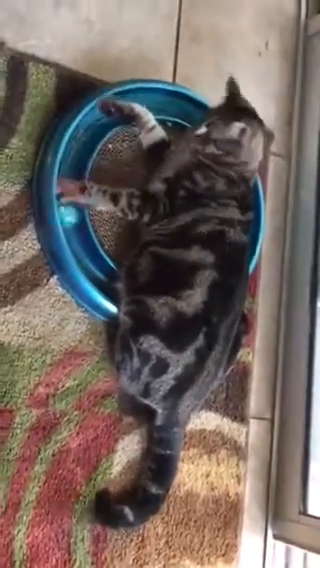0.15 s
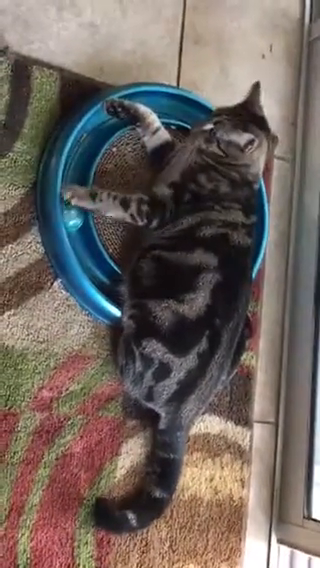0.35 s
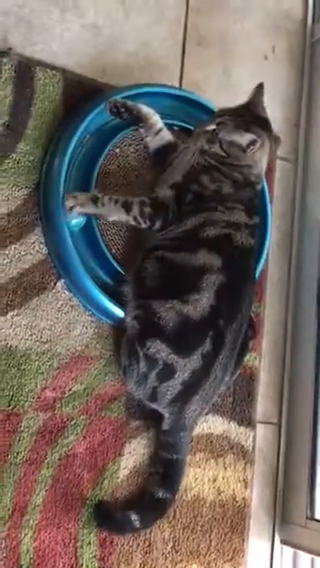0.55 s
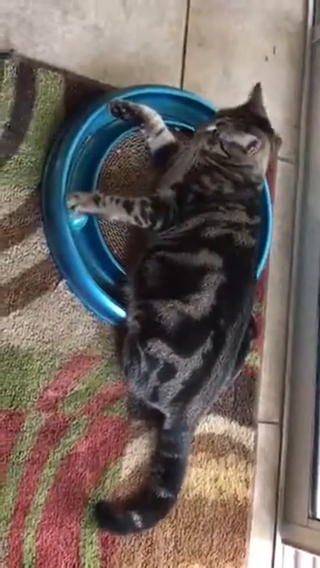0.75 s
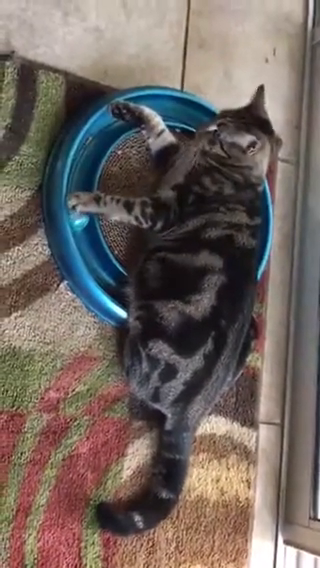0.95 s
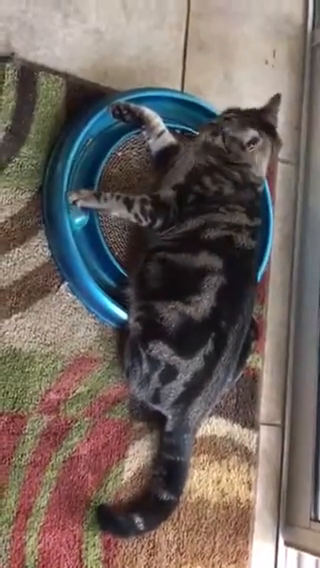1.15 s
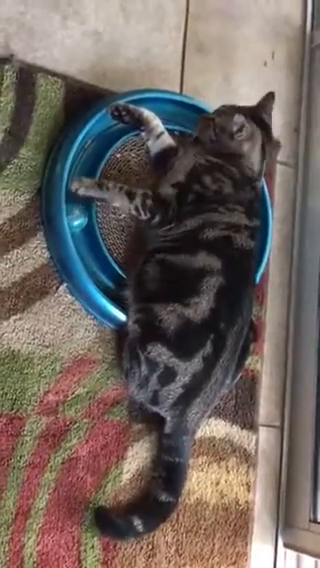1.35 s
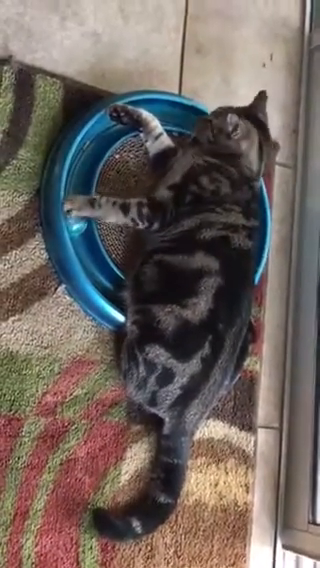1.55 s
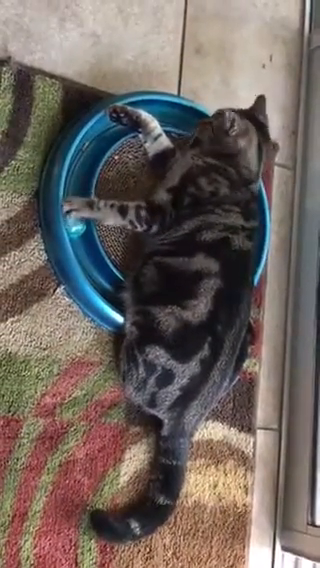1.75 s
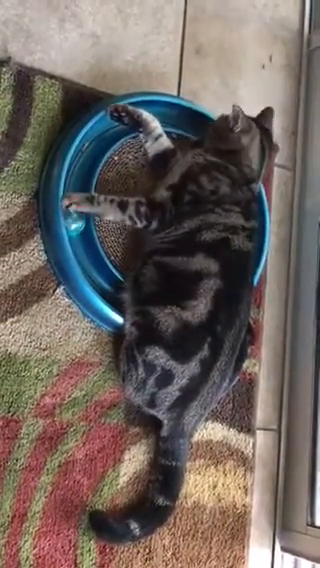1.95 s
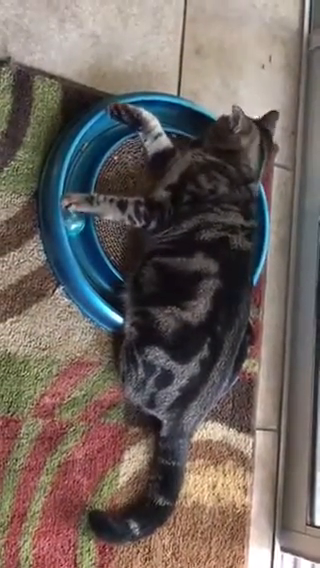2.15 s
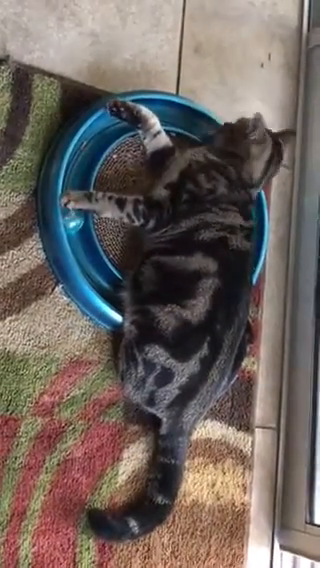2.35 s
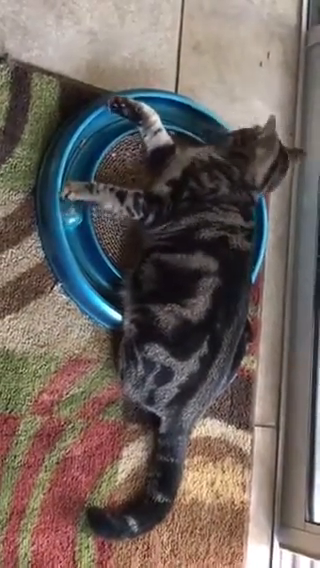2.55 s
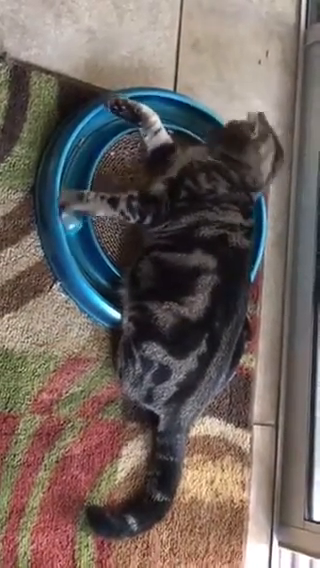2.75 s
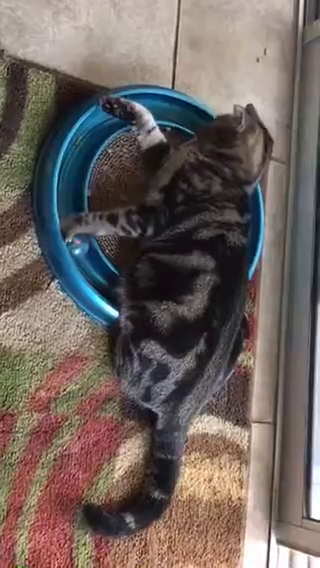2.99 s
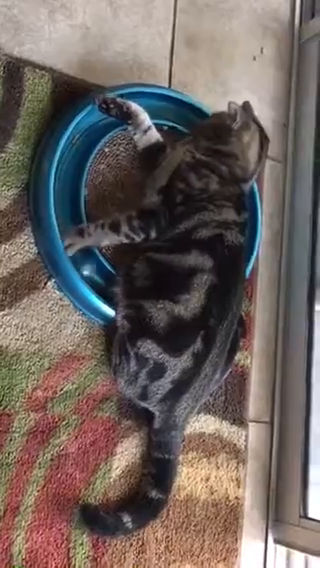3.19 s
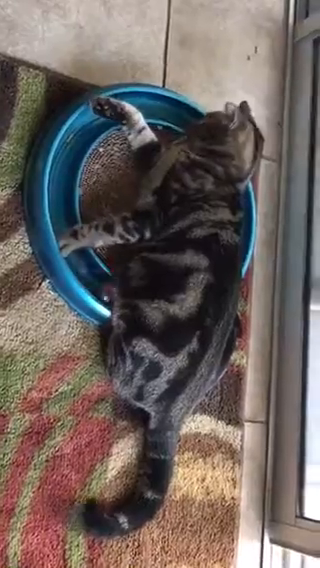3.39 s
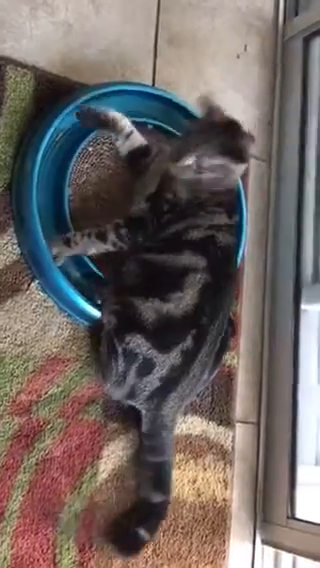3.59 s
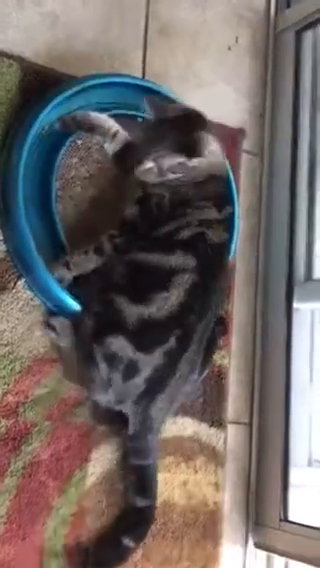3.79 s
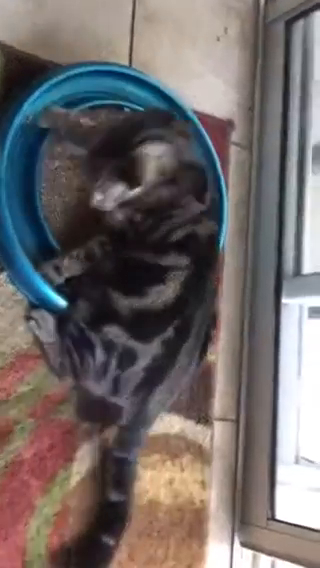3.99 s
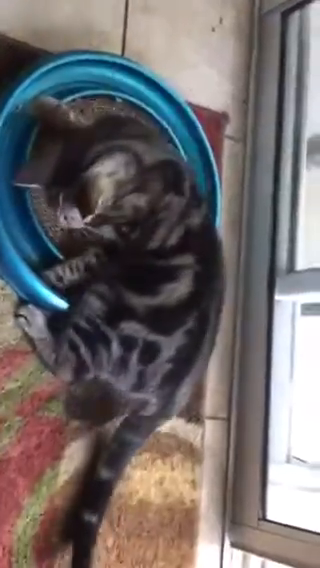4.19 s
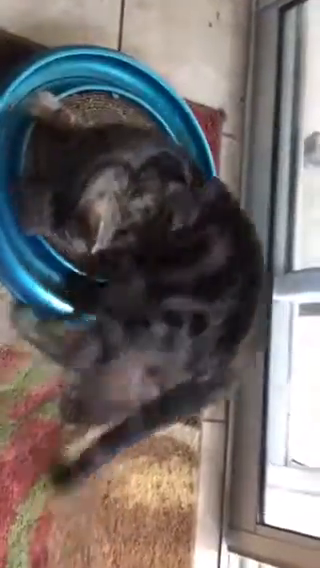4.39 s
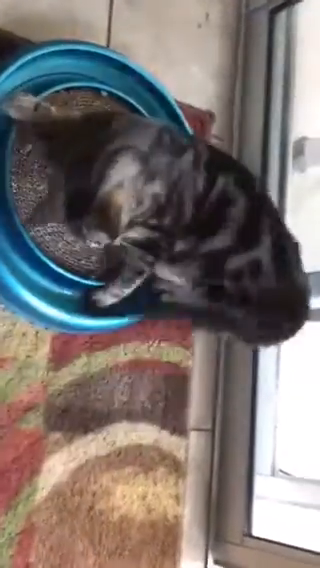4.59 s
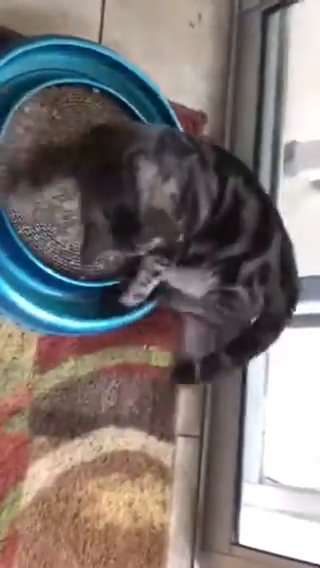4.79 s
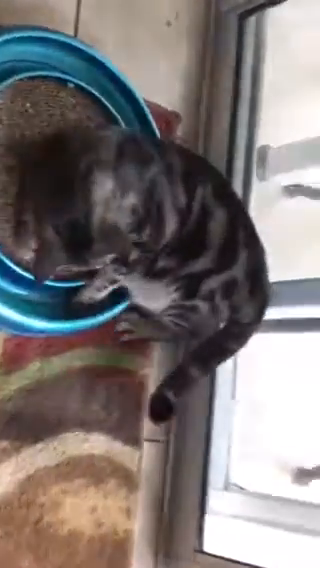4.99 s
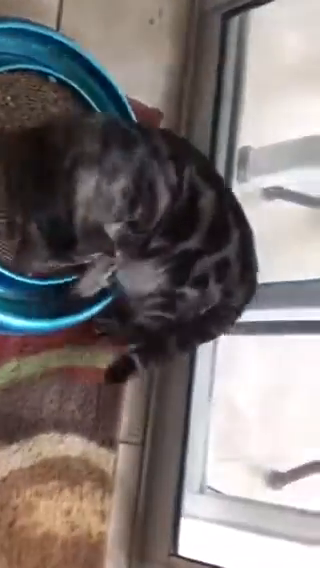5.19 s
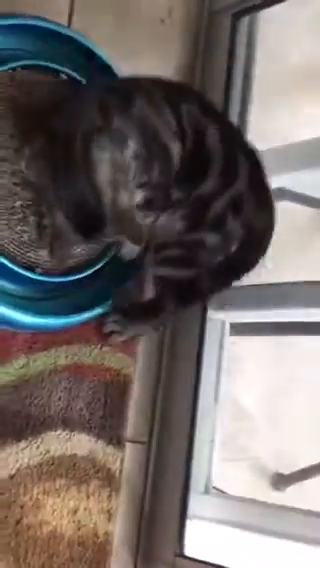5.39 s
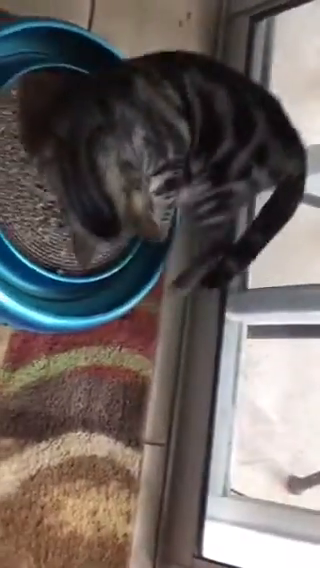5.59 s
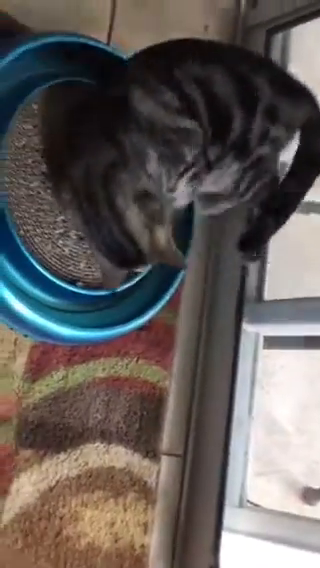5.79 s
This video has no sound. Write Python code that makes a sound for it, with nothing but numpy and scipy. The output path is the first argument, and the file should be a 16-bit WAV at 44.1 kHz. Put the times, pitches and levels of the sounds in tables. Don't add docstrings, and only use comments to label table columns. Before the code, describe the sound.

A kitten thumps and scuffs a hollow plastic toy nearby; cutlery and crockery clatter farther off, with two short chair squeaks midway.

```python
import sys
import numpy as np
from scipy import signal
from scipy.fft import rfft, irfft, next_fast_len
from scipy.io import wavfile
from scipy.ndimage import uniform_filter1d, map_coordinates

SR = 44100
rng = np.random.default_rng(int(sys.argv[2]) if len(sys.argv) > 2 else 0)


def ratio_of_db(decibels):
    return 10 ** (np.asarray(decibels, float) / 20)


def put_to_file(sound):
    columns = np.atleast_2d(sound).T
    safe = np.clip(columns, -1, 1)
    whole_steps = np.round(safe * 32767)
    wavfile.write(sys.argv[1], SR, whole_steps.astype(np.int16))


N = 257544

# frequency [Hz], density [dB per Hz].
AIR_SPECTRUM = [(20, -43), (35, -1), (65, 4), (114, 0.5), (165, -3.5), (390, -17.5), (520, -53), (900, -72)]
HISS_SPECTRUM = [(300, -19.5), (2460, -25.5), (7000, -39), (10000, -46), (13000, -33), (15800, -47)]
# frequency [Hz], level [dB].
FRIDGE_HUM = [(59.5, -70.5), (119.5, -73), (188, -79), (236, -77.5), (380, -80)]
# frequency [Hz], t60 [s].
ROOM_T60 = [(200, 0.32), (1300, 0.45), (4000, 0.42), (10000, 0.3)]

# frequency [Hz], density [dB per Hz].
RUB_SPECTRUM = [(650, -10), (1100, -1), (1850, 2), (3840, 2.5), (4980, -1), (8290, -3.5), (12000, -18),
                (15600, -40)]
FINE_SPECTRUM = [(3000, -37), (5000, -0.5), (7600, -3), (9500, 1.5), (13200, -4), (16000, -10)]
# resonance [Hz], width [Hz], level [dB].
RING_MODES = [(218, 60, 1), (296, 70, 5), (412, 60, -0.5), (576, 124, 1), (896, 254, -8.5), (1115, 440, -9)]
SCUFF_MODES = [(1150, 610, 0), (1930, 620, 1.5), (3000, 830, -11)]
# start [s], length [s], strength [dB], fine hiss over the rub [dB].
STROKES = [(0, 0.039, -59, -10), (0.105, 0.29, -58, -5.5), (0.683, 0.064, -65.5, -8),
           (0.941, 0.14, -56.5, -8.5), (1.14, 0.14, -71, -4), (1.625, 0.089, -54.5, -17),
           (1.802, 0.081, -67.5, -20), (2.368, .03, -72.5, -7), (2.713, 0.023, -73, -7),
           (2.811, 0.12, -66, 1.5), (3.03, 0.15, -76, -2), (3.508, .01, -62.5, -13),
           (3.603, 0.32, -67, 4.5), (4.044, 0.24, -64, -10), (4.414, 0.082, -62, 0.5),
           (4.57, 0.12, -69, -14), (4.72, 0.041, -61, -1), (4.8, 0.14, -74, -5), (5.094, 0.13, -70, 4.5),
           (5.27, 0.058, -65, -2), (5.35, .04, -63.5, -3), (5.42, 0.084, -64, -5.5),
           (5.56, 0.18, -67.5, -12), (5.761, .1, -64.5, 2)]
# start [s], length [s], strength [dB].
SHOVES = [(0, .02, -54), (.06, 0.07, -53), (.16, .06, -60), (2.6, 0.17, -66), (2.78, 0.18, -65.5),
          (3.215, 0.079, -55.5), (3.36, 0.13, -62.5), (3.5, 0.014, -53), (3.76, 0.11, -58.5),
          (3.97, 0.027, -59.5), (4.04, 0.045, -57.5), (4.11, 0.0052, -45), (4.2, 0.082, -62.5),
          (4.39, 0.071, -51.5), (4.47, 0.032, -48), (4.53, 0.014, -45), (4.65, 0.17, -62),
          (4.87, 0.01, -54), (5.29, 0.06, -49), (5.48, 0.068, -55), (5.72, .12, -63.5)]

# time [s], strength [dB], weight [dB], hard edge [dB].
THUMPS = [(.0875, -48, 9, -8), (.108, -50, 3.5, -12), (.1235, -45.5, 3, -8), (2.572, -55.5, 10.5, -21),
          (2.824, -43, 6.5, -14), (3.1, -56.5, 6, -20), (3.206, -42.5, 5.5, -29), (3.255, -37, -6, -23),
          (3.272, -41, -10, -32), (3.516, -42, 1, -11), (3.534, -47, -13, -15), (4.102, -40.5, 3, -8),
          (4.12, -42, 9, -10), (4.491, -47, 2, -14), (4.5229, -40.5, 12.5, -5), (4.556, -42.5, -4, -12),
          (4.798, -42.5, -17, -1), (4.863, -42, -0.5, -2), (5.2822, -38.5, 3, -2.5), (5.344, -41, -1, -7),
          (5.491, -55, -15, -15), (5.5129, -45, 7.5, -16), (5.774, -47, -8, -16), (5.803, -49.5, -5, -7)]
# time [s], strength [dB], snap [dB], sharp edge [dB].
TICKS = [(0.074, -51, -10, -14), (.568, -53, -14, -22), (2.737, -58.5, 0, 0), (2.746, -57, -11, -14),
         (3.284, -56.5, -2, 0.5), (4.086, -50, -5, -12), (4.303, -53, -6, -10), (4.386, -55, -12, -12),
         (4.3965, -45, 2, 0), (4.448, -53, -10, -10), (4.543, -56, -4, -4), (4.585, -47, -2, -12),
         (4.629, -49, -10, -14), (4.674, -47, 3, -9), (4.767, -44, -1, -8), (4.819, -47, -8, -18),
         (4.847, -53, -14, -16), (4.862, -43, 6, 9.5), (4.935, -51, -3, -9), (4.945, -46, -2, -8),
         (4.976, -63, 9, 10), (5.321, -52, -10, -18), (5.36, -53, -8, -18), (5.579, -54, 1, 1),
         (5.82, -46.5, -10, -14)]
# region [Hz], width [Hz], level [dB], t60 of the push [s], punch [ratio].
CONTACT_PARTS = [
    (271, 145, 14.5, 0.039, 11.9),
    (578, 556, 15, 0.031, 6.2),
    (1840, 1700, 13.5, 0.013, 3.6),
    (4300, 3200, 10.5, 0.008, 4.2),
    (8200, 6500, 9.5, 0.006, 4.0),
]

# time [s], peak [dB].
FORK_MODES = [(1507, 41, -8), (3880, 120, 0), (5400, 33, -6), (7080, 100, 3.5), (8400, 22, -9),
              (9020, 49, -3), (11100, 83, -6), (13600, 39, -8)]
FORK_HITS = [(0.122, -61), (0.171, -57), (0.2444, -62), (0.292, -58), (1.146, -57.5), (1.2145, -77),
             (1.271, -65), (1.305, -65.5), (1.8007, -61), (2.394, -55.5)]
SPOON_MODES = [(4600, 19, -20), (5570, 107, -8), (8380, 79, 4.5), (10550, 38, -0.5), (12400, 35, -14),
               (15600, 97, -10)]
SPOON_HITS = [(1.916, -66), (2.216, -58), (2.887, -55.5), (2.92, -62), (3.06, -67.5), (3.477, -47.5),
              (3.559, -65)]
KNIFE_MODES = [(6160, 48, 0), (7360, 41, -19), (8340, 41, -5), (9360, 32, -6.5), (11200, 35, -22),
               (12400, 226, -4.5), (14100, 54, -31)]
KNIFE_HITS = [
    (5.0426, -46),
    (5.1078, -51.5),
    (5.19, -51),
]
CUP_MODES = [(943, 34, -4.5), (2504, 54, -9.5), (3660, 65, -8)]
CUP_HITS = [
    (1.282, -51),
    (1.768, -52),
]
GLASS_MODES = [(4440, 25, 0)]
GLASS_HITS = [(0.5457, -72), (1.9165, -69), (3.477, -62), (4.664, -62), (4.725, -67)]
BOWL_MODES = [(665, 25.2, 0.5), (1450, 82, -9)]
BOWL_HITS = [
    (1.94, -72),
    (2.235, -60),
    (2.28, -64),
    (2.39, -83),
]
SAUCER_MODES = [(1496, 307, 2), (2180, 200, 11), (2447, 261, 11.5), (2720, 105, 3), (4000, 300, 3)]
SAUCER_HITS = [
    (1.22, -66),
    (2.026, -57),
]
TONGS_MODES = [(6630, 21, -7), (7480, 62, 1), (7900, 41, -4), (8900, 78, -6)]
TONGS_HITS = [
    (1.7995, -56),
    (1.826, -58),
]
PLATE_MODES = [(2920, 130, 0), (3910, 110, 3), (4340, 100, -5)]
PLATE_HITS = [
    (.867, -56),
    (0.892, -49),
    (.968, -53),
]
PAN_MODES = [(4840, 40, 0), (5610, 76, -3), (5990, 28, -3), (6370, 41, -7)]
PAN_HITS = [
    (4.1725, -51),
    (4.19, -54),
    (4.5865, -52),
]
LEG_MODES = [(1140, 70, 0), (2150, 60, 0), (3150, 90, -1)]
LEG_HITS = [
    (3.577, -44),
    (3.587, -42),
]

# time [s], strength [dB], pitch [octaves over the lowest region],
# fall away from that pitch [dB per octave].
KNOCKS = [(0.539, -58, .05, 21), (0.595, -46, 3.7, 8), (0.659, -45, 2.7, 8.5), (0.813, -56.5, 0.34, 5.5),
          (0.8672, -44, 0.76, 15), (0.8914, -34, 1.7, 22.5), (0.9691, -38, 1.5, 7),
          (1.2137, -51.5, 1.9, 11.5), (1.7796, -52.5, .05, 22), (1.8007, -41, 3, 16),
          (1.826, -51.5, 3.6, 7), (1.916, -56.5, 0.045, 1.5), (2.0252, -41.5, 0.48, 16),
          (2.2165, -51, 2.93, 5.5), (2.3935, -49.5, 2.9, 4.5), (2.8845, -49, 2.1, 4),
          (3.4658, -43, 2.6, 11.5), (3.847, -43.5, 3.0, 28), (4.0084, -42.5, 1.47, 15.5),
          (4.173, -37, 2.0, 11), (4.5856, -38.5, 2.78, 10.5), (4.657, -35, 3.54, 8.5),
          (5.044, -37, 2.74, 11.5), (5.1923, -37, 1.61, 15.5), (5.321, -36.5, 3, 27), (5.38, -39.5, 2.6, 9)]
# region [Hz], width [Hz], level [dB].
DISH_REGIONS = [(1274, 900, 12.5), (2850, 1900, 5), (5010, 2780, 4.5), (9900, 5700, -3)]

# time [s], rate [slips per second].
FIRST_RATE = [(3.572, 285), (3.593, 271), (3.599, 334), (3.61, 348), (3.622, 357.5), (3.645, 355),
              (3.67, 354), (3.74, 352)]
SECOND_RATE = [(3.725, 285), (3.745, 280), (3.756, 273), (3.77, 265), (3.79, 257.5), (3.89, 256)]
# time [s], force [dB], unevenness [dB].
FIRST_FORCE = [(3.572, -58, -3), (3.6, -35.5, 3), (3.61, -32.5, 0), (3.619, -29.5, -2), (3.638, -30, 0),
               (3.654, -44.5, 12), (3.672, -33.5, -7), (3.69, -52.5, 13), (3.74, -59, 2)]
SECOND_FORCE = [(3.722, -47, 1), (3.75, -47, -16), (3.761, -26.5, -18), (3.772, -26.5, -26),
                (3.788, -29, -7), (3.795, -35.5, 1.5), (3.812, -33, -6.5), (3.829, -43.5, 6.5),
                (3.891, -70, 7)]
# multiple of the slip rate [ratio], level [dB].
FIRST_ORDERS = [(.96, -22), (2, -23), (3.11, -8), (4.15, -8), (5, 0), (6.3, -15), (7.55, -11), (8, .5),
                (8.83, -8), (10.3, -12), (11.05, 2), (11.3, -8), (12.1, -11), (12.9, -11), (15.5, -14)]
SECOND_ORDERS = [(1.08, -26), (2.18, -32), (2.95, -32), (3.93, -19), (5, 0), (5.17, -13), (5.75, -18),
                 (6.12, -11), (7.2, -18), (8, -21), (9.15, -10), (10, -12), (10.7, -22), (12.5, -21),
                 (13.1, -18)]
# resonance [Hz], width [Hz], level [dB].
FIRST_FRAME = [(1150, 300, -1), (1650, 400, 1), (2930, 490, 2), (3740, 980, -1), (4620, 210, -4),
               (5350, 580, -9)]
SECOND_FRAME = [(1480, 500, 0), (2330, 370, -4), (3340, 440, -4)]
FIRST_SCREECH_MODES = [(7150, 460, 5), (8600, 700, 2), (12700, 990, 1), (14400, 1600, -2)]
SECOND_SCREECH_MODES = [(6820, 680, -2.5), (8430, 460, 6.5), (9470, 770, 2.5), (11700, 1100, -6),
                        (15200, 900, -9)]


def unit(x):
    return x / np.sqrt(np.mean(x ** 2) + 1e-20)


def along(points, hz):
    f, v = np.transpose(points)
    return np.interp(np.log(hz + 1), np.log(f + 1), v)


def curves(rows):
    s, *cols = np.transpose(rows)
    return [np.interp(np.arange(N) / SR, s, c) for c in cols]


def wobble(rate):
    knots = rng.standard_normal(int(N * rate / SR) + 4)
    return map_coordinates(knots, [np.arange(N) * rate / SR])


def filtered(x, response):
    m = next_fast_len(len(x) + SR // 4)
    return irfft(rfft(x, m) * response(np.fft.rfftfreq(m, 1 / SR)), m)[:len(x)]


def resonance(f, hz, width):
    damping = 1j * f * width
    return damping / (hz * hz - f * f + damping)


def twice(modes):
    return lambda f: sum((-1) ** k * ratio_of_db(db) * resonance(f, hz, 1.5 * width) ** 2
                         for k, (hz, width, db) in enumerate(modes))


def gritty(grit_db, rate):
    return rng.standard_normal(N) * ratio_of_db(grit_db * wobble(rate))


def room(x, wet_db):
    out, step, delay = np.pad(x, (0, SR)), SR // 7, 130
    for i in range(0, N, step):
        piece = x[i:i + step]
        if not piece.any():
            continue
        hz, t, z = signal.stft(rng.standard_normal(SR // 2), SR, nperseg=256)
        decay = ratio_of_db(-60 * t / along(ROOM_T60, hz)[:, None])
        tail = signal.istft(z * decay, SR, nperseg=256)[1]
        answer = signal.fftconvolve(piece, tail / np.linalg.norm(tail))
        out[i + delay:][:len(answer)] += ratio_of_db(wet_db) * answer
    return out[:N]


def strokes(rows, rise_db_s, fall_db_s, rest_db):
    t, power = np.arange(N) / SR, np.full(N, ratio_of_db(2 * rest_db))
    for s, length, db in rows:
        near = slice(max(0, round((s - .2) * SR)), round((s + length + .4) * SR))
        u = t[near] - s
        rise = rise_db_s * np.maximum(-u, 0)
        fall = fall_db_s * np.maximum(u - length, 0)
        power[near] += ratio_of_db(2 * (db - rise - fall))
    return np.sqrt(power)


def bursts(events, regions, length, rise, lag):
    out, t = np.zeros(N), np.arange(round(length * SR)) / SR
    noise = rng.standard_normal((len(events), len(regions), len(t))) * (1 - np.exp(-t / rise))
    for k, (hz, width, gain_db, t60, punch) in enumerate(regions):
        pushes = np.zeros(N + SR)
        for (s, db, *region_db), grain in zip(events, noise):
            push = np.append(punch, grain[k, 1:])
            start = round((s + lag) * SR)
            pushes[start:][:len(t)] += ratio_of_db(db + region_db[k] - 60 * t / t60) * push
        out += filtered(pushes[:N], twice([(hz, width, gain_db)]))
    return out


def rubbing():
    rumble = unit(filtered(gritty(grit_db=3.0, rate=110), twice(RING_MODES)))
    scuff = unit(filtered(gritty(grit_db=6.5, rate=180), twice(SCUFF_MODES)))
    rub = unit(filtered(gritty(grit_db=1.5, rate=210), lambda f: ratio_of_db(along(RUB_SPECTRUM, f))))
    fine = unit(filtered(gritty(grit_db=2.0, rate=280), lambda f: ratio_of_db(along(FINE_SPECTRUM, f))))

    rumble_gain = strokes(SHOVES, rise_db_s=650, fall_db_s=180, rest_db=-70.5)
    scuff_gain = ratio_of_db(-12) * strokes(SHOVES, rise_db_s=650, fall_db_s=303, rest_db=-85)
    rub_rows = [(s, length, db) for s, length, db, _ in STROKES]
    fine_rows = [(s, length, db + over) for s, length, db, over in STROKES]
    rub_gain = ratio_of_db(-0.4) * strokes(rub_rows, rise_db_s=256, fall_db_s=170, rest_db=-79.5)
    fine_gain = ratio_of_db(1.1) * strokes(fine_rows, rise_db_s=256, fall_db_s=170, rest_db=-82)
    return rumble_gain * rumble + scuff_gain * scuff + rub_gain * rub + fine_gain * fine


def air():
    spectrum = lambda f: ratio_of_db(along(AIR_SPECTRUM, f)) + ratio_of_db(along(HISS_SPECTRUM, f))
    noise = unit(filtered(rng.standard_normal(N), spectrum))
    t, hum = np.arange(N) / SR, np.zeros(N)
    for hz, db in FRIDGE_HUM:
        strength = ratio_of_db(db + 4.0 + 2.5 * wobble(3.75))
        hum += strength * np.sin(2 * np.pi * hz * t + 0.32 * wobble(12.0))
    return ratio_of_db(-61.5 + 2.0 * wobble(2.82)) * noise + hum


def contacts():
    claw_db, thud_db, hollow_db = -4.5, -22, -19
    rows = [(s, db, weight, 0, edge, edge + claw_db, edge + 2 * claw_db) for s, db, weight, edge in THUMPS]
    rows += [(s, db, thud_db, hollow_db, 0, snap, sharp) for s, db, snap, sharp in TICKS]
    return room(bursts(rows, CONTACT_PARTS, length=.03, rise=0.0005, lag=.0015), wet_db=-6.5)


def clinks(modes, hits, t60, gain_db):
    out, t = np.zeros(N + SR), np.arange(SR // 6) / SR
    attack = 1 - np.exp(-t / 0.0011)
    for s, db in hits:
        for hz, width, level in modes:
            detune, phase, size = rng.standard_normal((3, 8, 1))
            angle = 2 * np.pi * (hz + 1.098 * width * detune) * t + 3 * phase
            cluster = np.sum(ratio_of_db(2.74 * size) * np.sin(angle), axis=0)
            fade_db = 60 * t / t60 * (hz / 6000) ** 0.23
            peak_db = db + gain_db + level + 1.4 * size[0] - 5.0
            out[round(s * SR):][:len(t)] += ratio_of_db(peak_db - fade_db) * cluster * attack
    return out[:N]


def tableware():
    pieces = [clinks(FORK_MODES, FORK_HITS, t60=0.1, gain_db=-3.5),
              clinks(SPOON_MODES, SPOON_HITS, t60=0.12, gain_db=-6.5),
              clinks(GLASS_MODES, GLASS_HITS, t60=0.077, gain_db=-1.0),
              clinks(PLATE_MODES, PLATE_HITS, t60=0.055, gain_db=-7),
              clinks(SAUCER_MODES, SAUCER_HITS, t60=0.1, gain_db=-8.5),
              clinks(CUP_MODES, CUP_HITS, t60=0.062, gain_db=-5),
              clinks(TONGS_MODES, TONGS_HITS, t60=.05, gain_db=-4),
              clinks(BOWL_MODES, BOWL_HITS, t60=0.18, gain_db=-5.5),
              clinks(LEG_MODES, LEG_HITS, t60=.03, gain_db=-6),
              clinks(PAN_MODES, PAN_HITS, t60=.06, gain_db=-5),
              clinks(KNIFE_MODES, KNIFE_HITS, t60=0.13, gain_db=-7)]
    return sum(pieces)


def knocks():
    octaves = np.log2([hz / DISH_REGIONS[0][0] for hz, _, _ in DISH_REGIONS])
    rows = [(s, db, *(-fall * abs(octaves - pitch))) for s, db, pitch, fall in KNOCKS]
    regions = [(*region, .06, 0) for region in DISH_REGIONS]
    return bursts(rows, regions, length=.08, rise=0.0025, lag=.0005)


def squeak(rates, force, orders, frame, bright, catch, trail, jitter, flutter_db):
    force_db, uneven_db = curves(force)
    full_db, begin = force_db.max(), force[0][0]
    t = np.arange(N) / SR
    on = np.flatnonzero((t > begin) & (t < force[-1][0]))

    catch_s, above_multiple, before_db, after_db, swing_share = catch
    uncaught = np.clip((catch_s - t[on]) / 0.0093 + .5, 0, 1)
    upper_db = after_db + (before_db - after_db) * uncaught + swing_share * (force_db[on] - full_db)

    screech_full_db, share, smooth_s, lag_s = trail
    late_db = np.roll(uniform_filter1d(force_db, round(smooth_s * SR)), round(lag_s * SR))
    screech_db = screech_full_db + share * (late_db - full_db)

    phase = 2 * np.pi * np.cumsum(curves(rates)[0] * (1 + jitter * wobble(140))) / SR
    out, knots = np.zeros(N), [(t[on] - begin) * 90]
    for k, db in orders:
        flutter = map_coordinates(rng.standard_normal(40), knots)
        drift = map_coordinates(rng.standard_normal(40), knots)
        level_db = db + 2.0 + force_db[on] + upper_db * (k > above_multiple) + flutter_db * flutter
        out[on] += ratio_of_db(level_db) * np.sin(k * phase[on] + 6 * rng.random() + 0.054 * k * drift)

    grind = ratio_of_db(force_db + uneven_db) * unit(filtered(gritty(grit_db=3.0, rate=220), twice(frame)))
    screech = ratio_of_db(screech_db) * unit(filtered(gritty(grit_db=2.4, rate=45), twice(bright)))
    out[on] += grind[on] + screech[on] * signal.windows.tukey(len(on), .4)
    return out


def chair():
    first = squeak(FIRST_RATE, FIRST_FORCE, FIRST_ORDERS, FIRST_FRAME, FIRST_SCREECH_MODES,
                   catch=(5.5, 9.5, 2, -12, 1.5), trail=(-51, .8, .03, .008), jitter=0.003, flutter_db=1.5)
    second = squeak(SECOND_RATE, SECOND_FORCE, SECOND_ORDERS, SECOND_FRAME, SECOND_SCREECH_MODES,
                    catch=(3.5, 9, 10, -2, -0.7), trail=(-39, 0.55, 0.068, .018), jitter=0.004, flutter_db=1.6)
    return first + second


def scene():
    near = rubbing() + contacts()
    far = room(tableware(), wet_db=0.0) + room(knocks(), wet_db=4.5) + room(chair(), wet_db=-6.0)
    return (near + far + air())[None]


def roll_off(x):
    return signal.sosfilt(signal.butter(12, 16660, fs=SR, output="sos"), x)


def record(dry):
    edge_hz, top_hz = 15930, 16600

    def port(f):
        dip_db = -6 * np.exp(-((f - 10550) / 300) ** 2)
        return ratio_of_db(dip_db - 24 * (f > edge_hz)) * (f < top_hz)

    return roll_off(filtered(dry[0], port)[None])


dry = scene()
out = record(dry)
put_to_file(out)
```